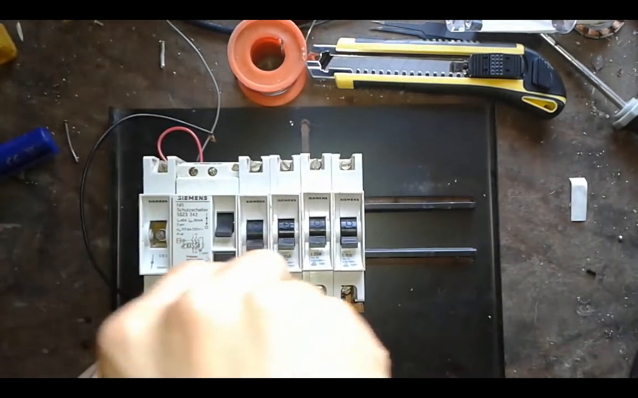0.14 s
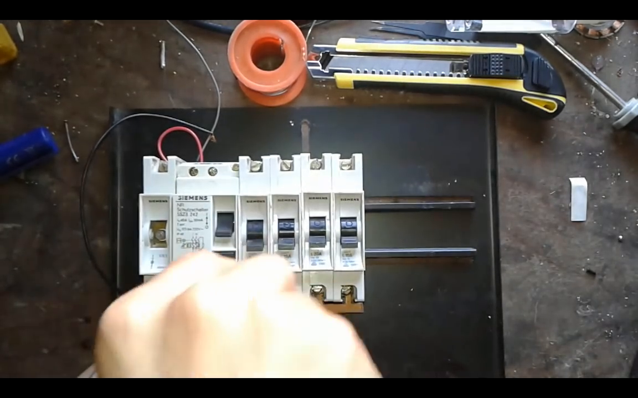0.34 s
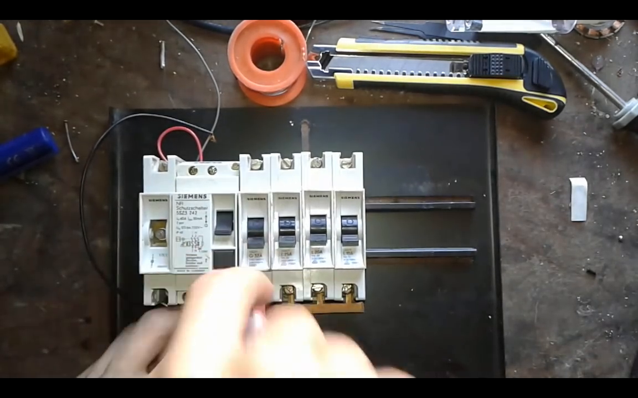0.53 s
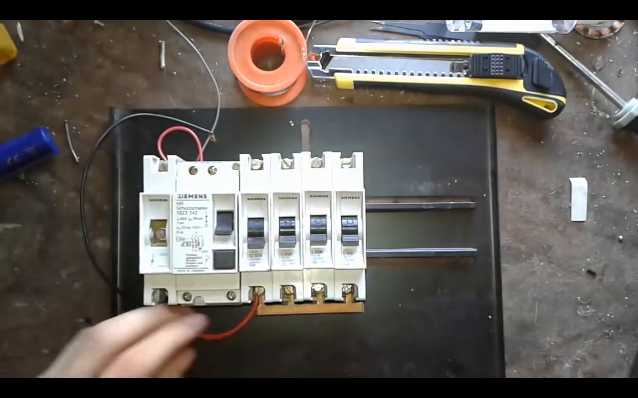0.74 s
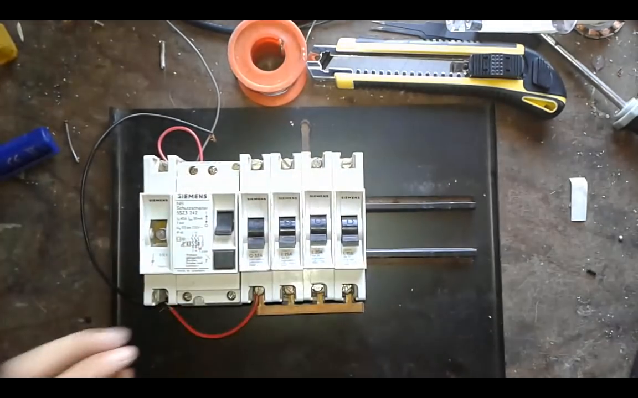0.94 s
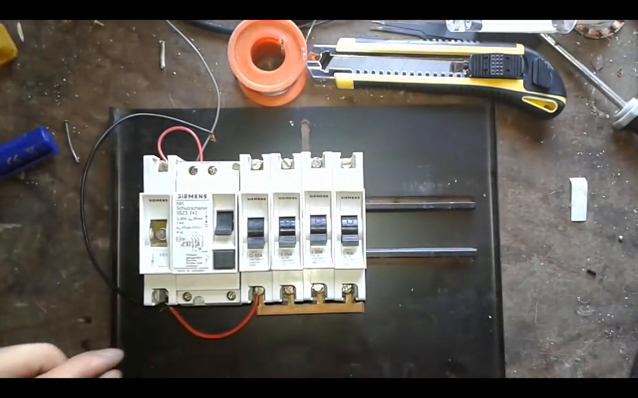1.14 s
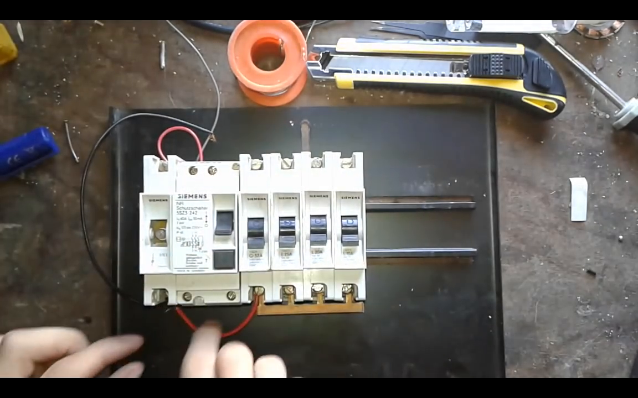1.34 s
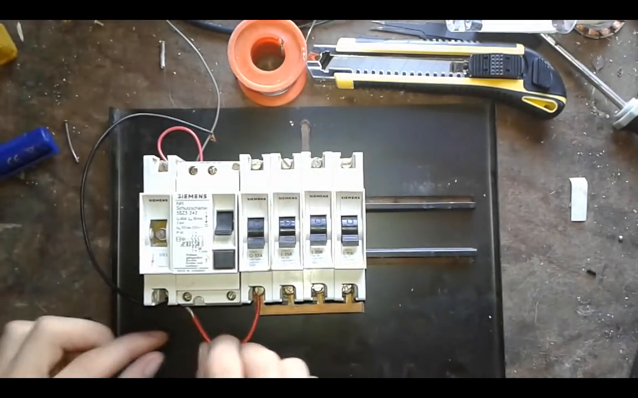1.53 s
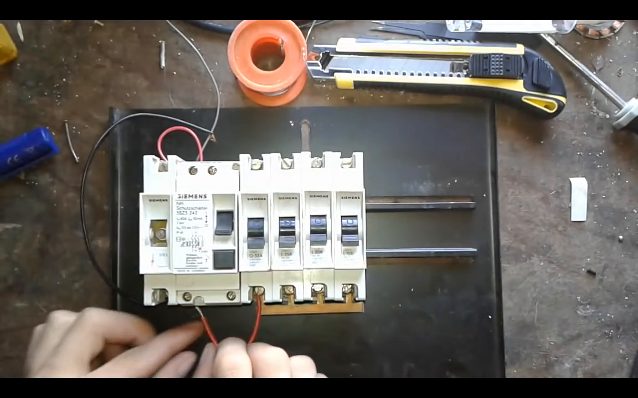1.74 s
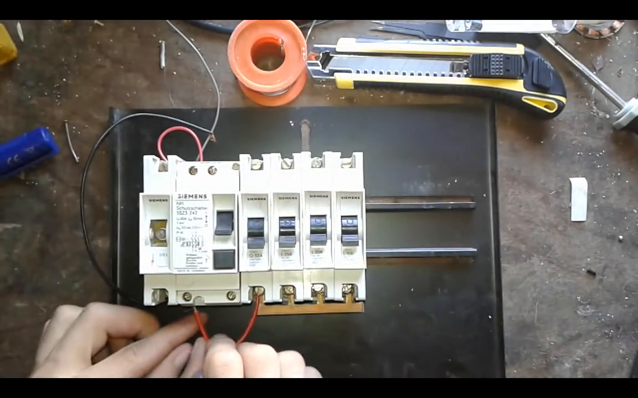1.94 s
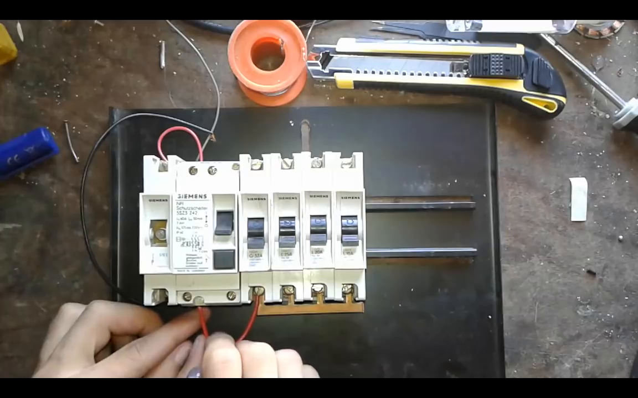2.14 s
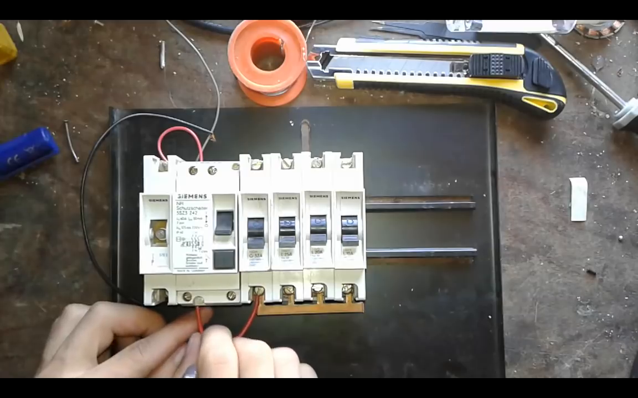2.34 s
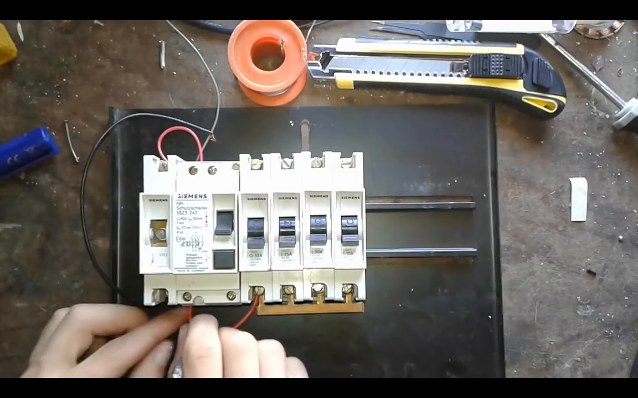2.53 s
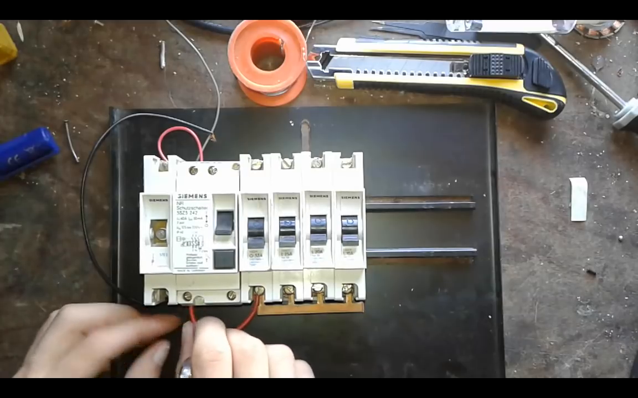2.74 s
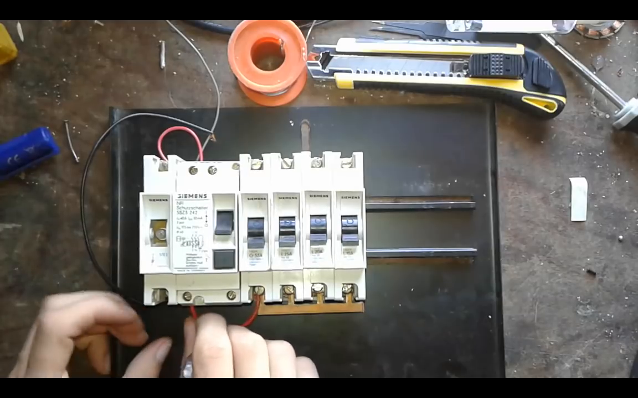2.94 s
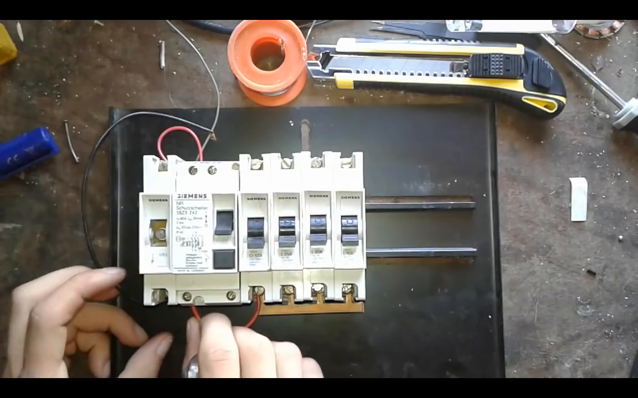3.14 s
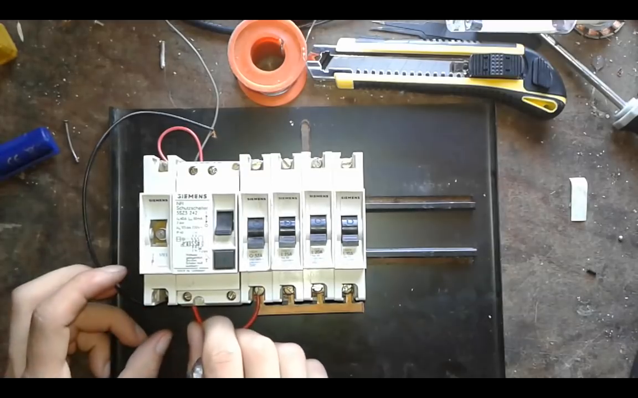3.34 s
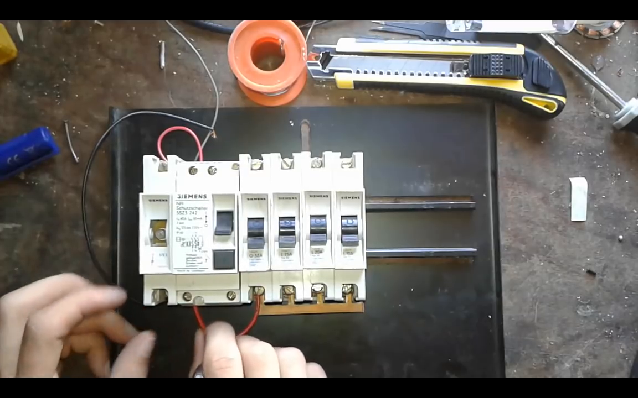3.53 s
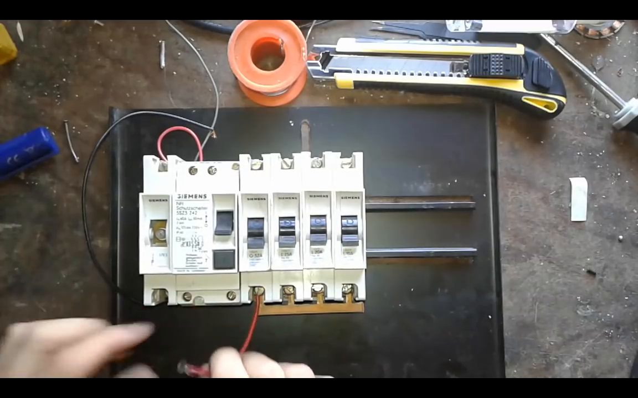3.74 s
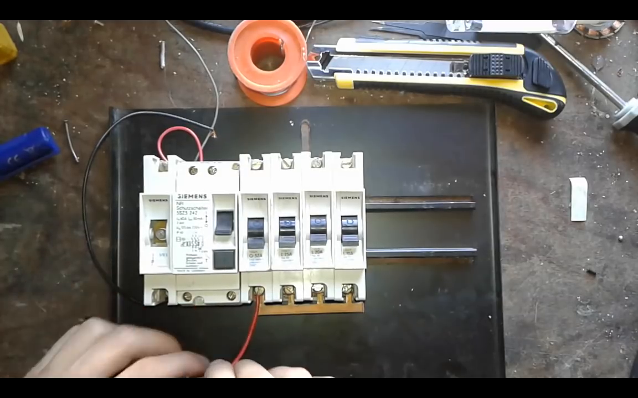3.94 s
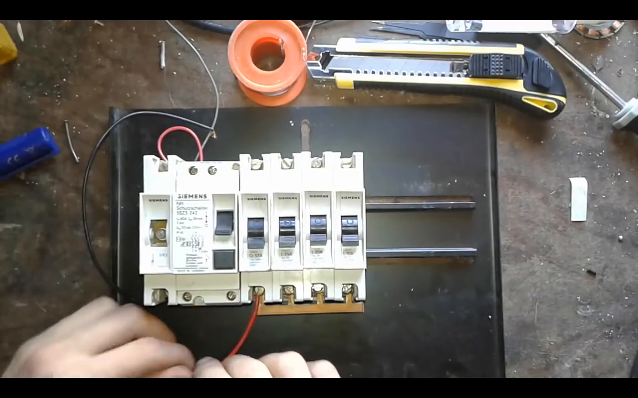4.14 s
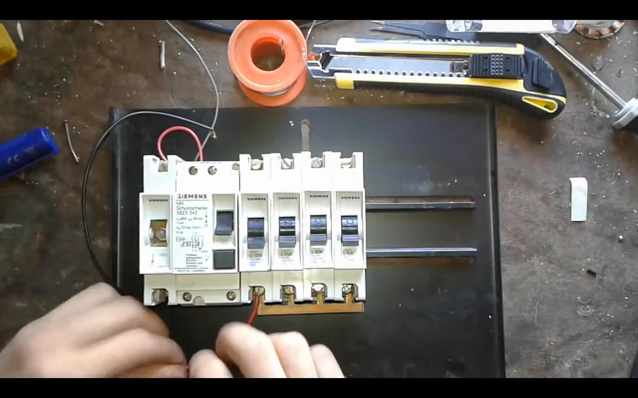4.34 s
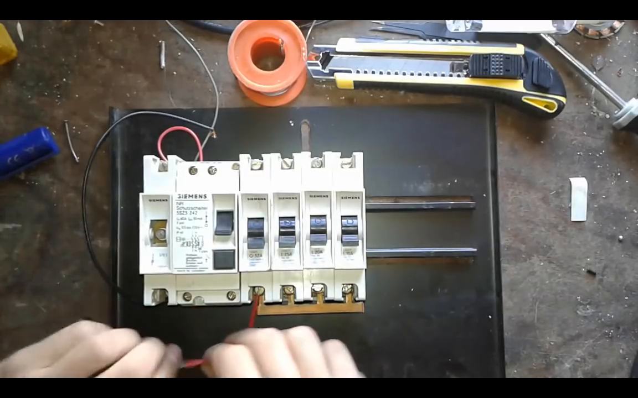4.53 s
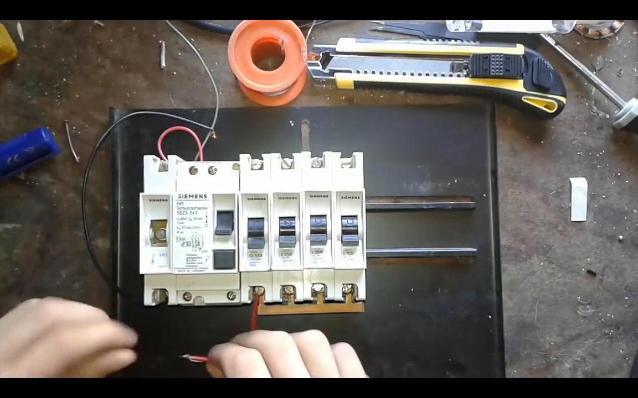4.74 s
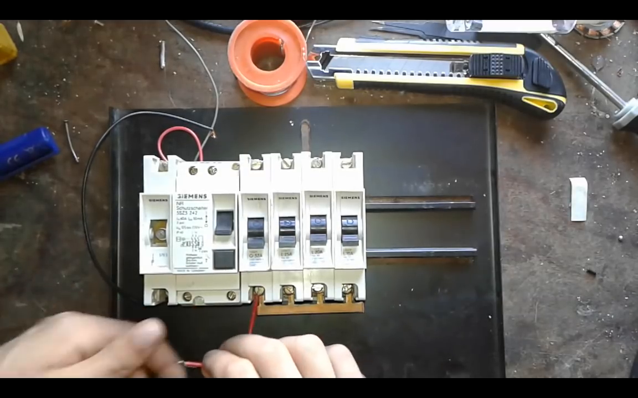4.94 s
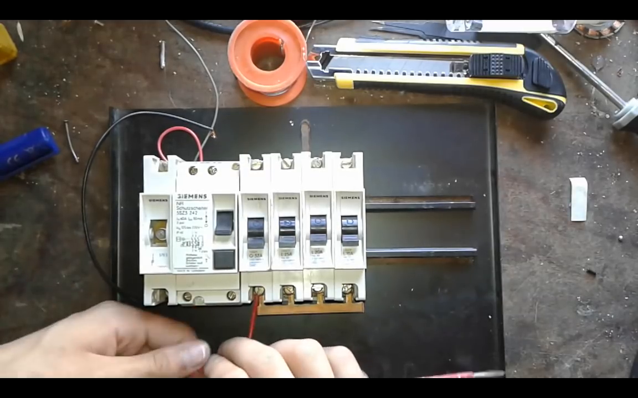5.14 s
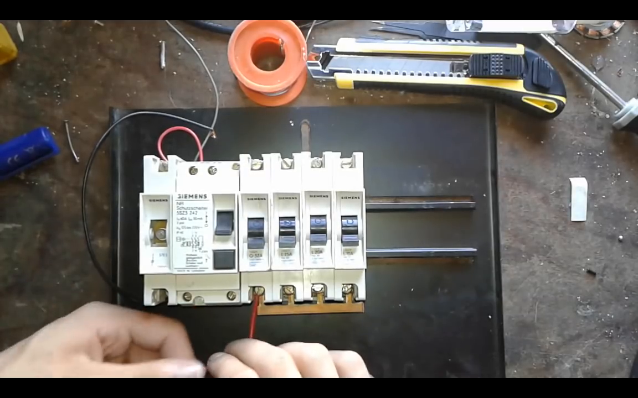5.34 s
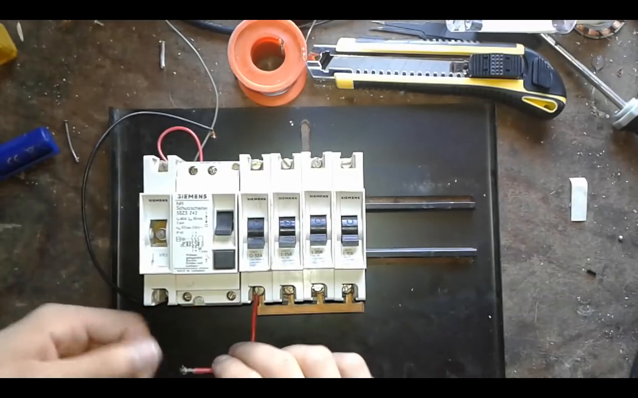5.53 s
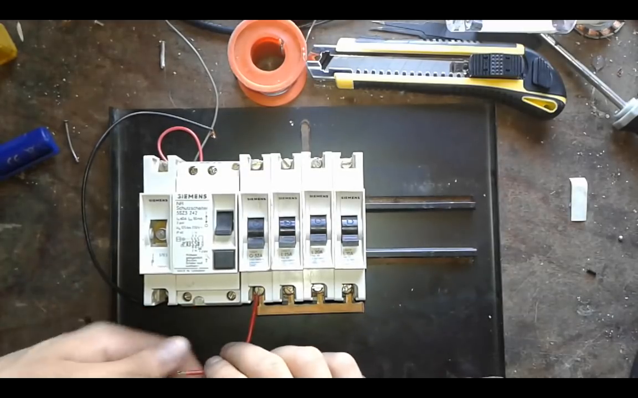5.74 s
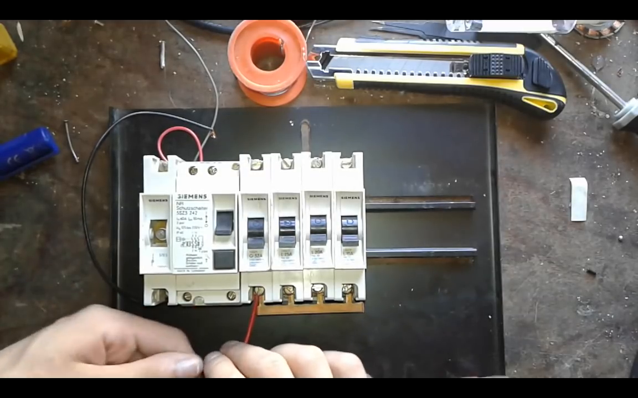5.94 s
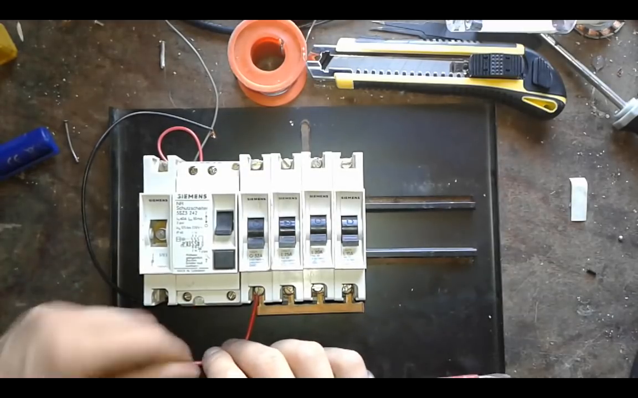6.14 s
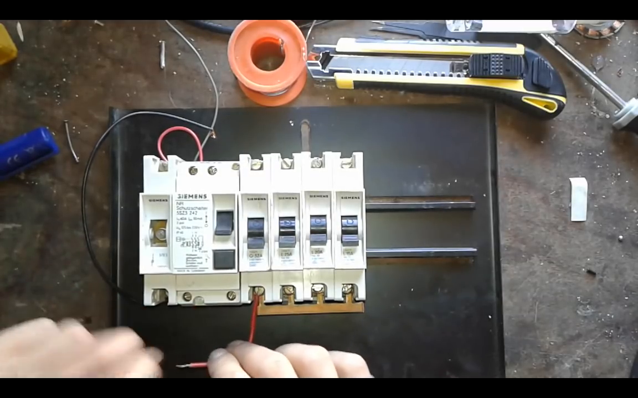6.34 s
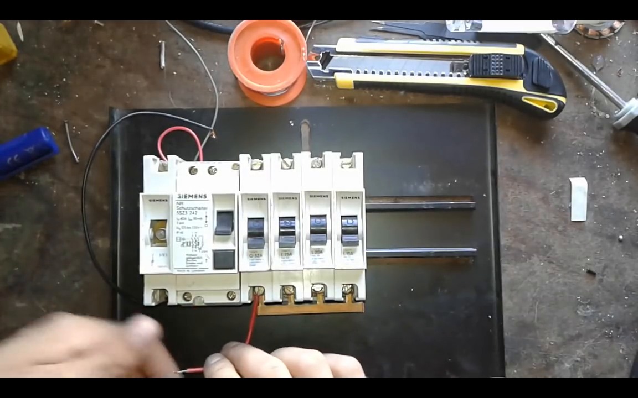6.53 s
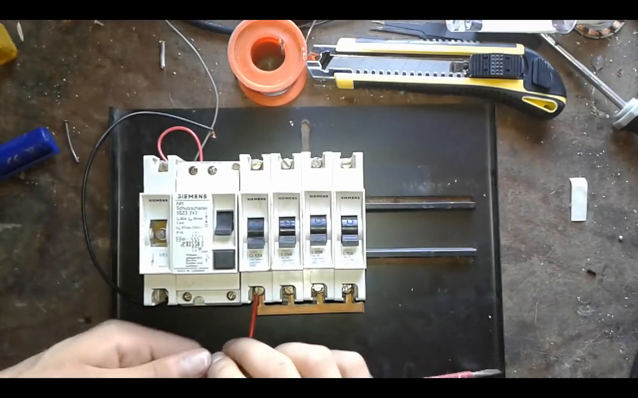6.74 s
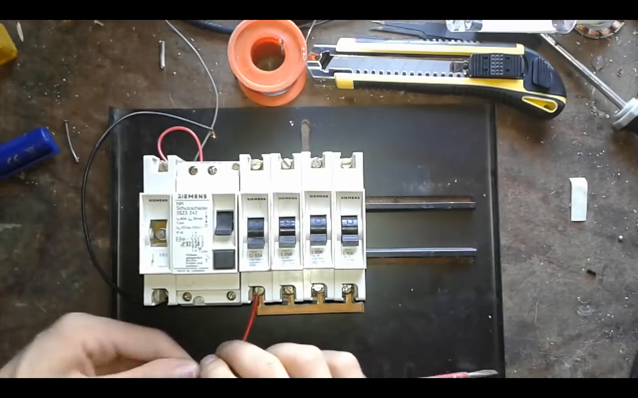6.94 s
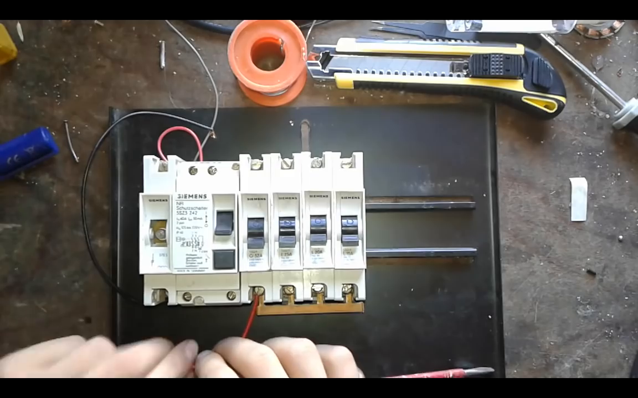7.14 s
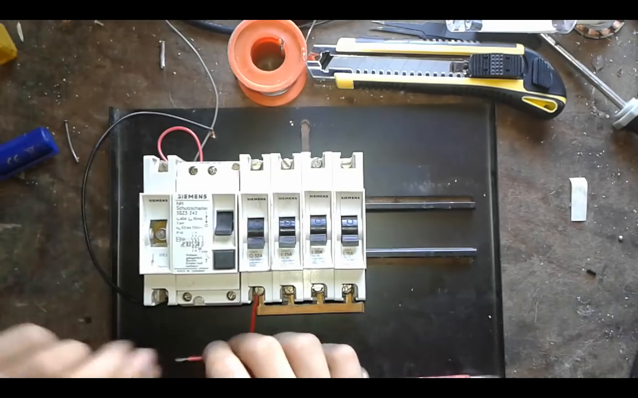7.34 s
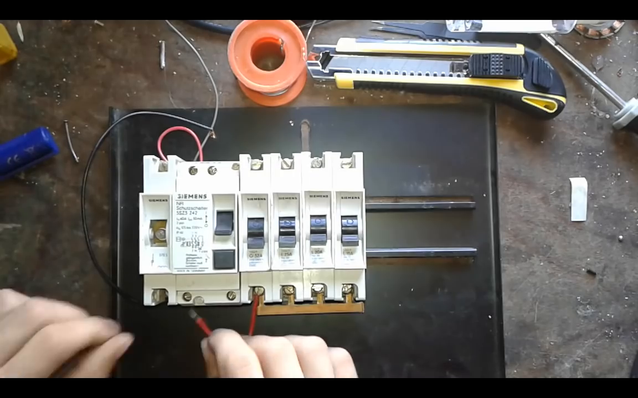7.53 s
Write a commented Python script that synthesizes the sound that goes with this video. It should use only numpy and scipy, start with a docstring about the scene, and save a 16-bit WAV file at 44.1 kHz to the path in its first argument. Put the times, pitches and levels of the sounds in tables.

```python
"""Soft hiss with a thin whine is heard first; metallic ticks, scrapes, clacks and knocks then stand out of it.
A wire is fitted to a row of plastic circuit breakers on a board: it ticks and slides in the terminals,
the housings clack, a hand tool knocks on the board and its steel jaws snap. Each contact is shaped noise
plus decaying modes; slides are trains of tiny slips, faint tones and squeaks are gliding sines. A small
microphone close above picks up all this with the reflections of the bench and a dry room."""
import sys
import numpy as np
from scipy import signal
from scipy.fft import rfft, irfft, next_fast_len
from scipy.io import wavfile
from scipy.ndimage import uniform_filter1d

SR = 44100
rng = np.random.default_rng(int(sys.argv[2]) if len(sys.argv) > 2 else 0)


def master(y):
    """Save y as 16-bit WAV."""
    cut = np.clip(np.atleast_2d(y).T, -1, 1)
    pcm = np.round(cut * 32767)  # scale
    wavfile.write(sys.argv[1], SR, pcm.astype(np.int16))


N = 334278  # samples

# Noise bands a quarter octave wide, and their centres [Hz]
BAND_EDGES_HZ = np.geomspace(22, 16500, 39)
BAND_HZ = np.sqrt(BAND_EDGES_HZ[1:] * BAND_EDGES_HZ[:-1])
# Time since a contact [s]; its first 30 ms set its level [samples]
AGE_S = np.arange(int(0.5 * SR)) / SR
LOUD_SAMPLES = int(0.03 * SR)
# Four zones of the spectrum (thud, middle, clack, treble): edges_hz, centres_hz
ZONE_EDGES_HZ = [600, 2000, 3600]
ZONE_CENTRES_HZ = [280, 1150, 2700, 5500]
ZONE_OCTAVES = np.log2(np.array(ZONE_CENTRES_HZ) / ZONE_CENTRES_HZ[1])

# Steady hiss, relative spectral density: pitch_hz, level_db (per Hz)
HISS_COLOUR = [(20,-24), (60,1.5), (140,0.5), (340,-5), (470,-7), (750,-7), (1300,-10), (2100,-13),
               (5700,-13), (7300,-9), (10000,-15), (16000,-18.5)]
# Narrow whines and hums: pitch_hz, nominal_width_hz, level_db (rms)
WHINES = [(7460, 64, -79), (6770, 650, -80.5), (5110, 260, -84.5), (472.4, 29, -83), (421.7, 26, -84)]
# Brief dips of the whole background: middle_s
DIP_TIMES = [3.06, 3.35]
HISS_LEVEL_DB = -69.5
DIP_DB, DIP_WIDTH_S = -4, 0.069

# Contacts: start_s, strength_db (before the gain of its layer), thud_db (bass relative to strength),
# hardness_db_per_octave (treble slope), hold_s (before it dies away),
# partials of the struck spot [(pitch_hz, level_db)]
TERMINAL_TICKS = [(0.359,-64,5,4.3,0.025,[]), (0.41,-60,0,4.7,0.003,[(5700,-55)]),
                  (.429,-45,-14,8.3,0.0047,[(3950,-43.5)]), (.448,-46,-8.5,5.4,0.004,[(5835,-50)]),
                  (.463,-48.5,-6,2.7,0.0051,[]), (.737,-53,6,0.86,0.0027,[]), (.775,-59,-8,8,0.0062,[]),
                  (3.707,-44.5,-16,2.4,0.022,[]), (3.721,-42.5,-14.5,3.3,0.041,[]),
                  (3.744,-43.5,-6.5,2.4,0.0035,[(2676,-46), (3960,-45.5)]),
                  (7.393,-39.5,-10.5,6.26,0.0076,[(1028,-47.5), (9270,-45)])]
BREAKER_KNOCKS = [(1.422,-38,-5.5,7,0.0063,[]), (1.433,-32,-9.5,0.7,0.0089,[(2630,-43), (3360,-38)]),
                  (1.471,-30,-15,1,0.007,[]), (1.483,-33.5,-4,-1.5,0.0025,[(285,-43.5), (1112,-38.5),
                  (1565,-41.5)]), (1.623,-47,-7,0.5,0.0092,[]), (3.578,-49.5,-11,-1.5,0.023,[]),
                  (4.519,-36.5,-5,-9,0.0054,[(250,-40.5)])]
BOARD_KNOCKS = [(4.482,-41,2.5,-0.5,0.0072,[]), (4.493,-38,-4,1.5,0.0097,[]),
                (4.51,-30.5,-7.5,1,0.0067,[(590,-50.5), (1960,-44.5)]), (5.105,-52.5,7,1,0.014,[]),
                (5.789,-45,7,2.5,0.018,[(420,-50)]), (6.484,-51,1.5,-0.2,0.017,[]),
                (6.605,-36,-4.5,-1,0.017,[]), (6.637,-33,-3.5,2,0.01,[(5200,-51)]),
                (7.108,-61,4.5,1.5,0.0068,[]), (7.183,-30,-11,-4,0.012,[(1930,-44.5), (416,-48.5),
                (2200,-52.5), (2460,-54)]), (7.528,-38.5,-6.5,-0.5,0.023,[]),
                (7.55,-39,2,-4,0.031,[(1220,-46)])]
JAW_SNAPS = [(5.215,-47,2.5,7,0.011,[(1290,-53.5)]), (5.927,-52,3.5,6.6,0.0084,[]),
             (6.637,-57.5,-3,6,0.006,[])]
FINGER_TAPS = [(5.356,-55.5,-0.5,-1,0.018,[]), (5.559,-55,-2.5,-3,0.054,[]), (6.16,-50.5,-1.5,-1,0.025,[])]
# Light touches of the wire's tip feeling for the terminal:
# start_s, strength_db (before the gain of its layer), hardness_db_per_octave, hold_s
GRAZES = [(1.903,-72,6,0.0046), (2.178,-68,4.5,0.0031), (2.297,-69,4.5,0.018), (2.399,-66.5,4.5,0.02),
          (2.498,-61,0.5,0.03), (2.649,-65.5,3.5,0.022), (2.859,-68,4,0.003), (4.746,-66,1.5,0.025)]
GRAZE_THUD_DB = -5
FINGER_TOP_HZ = 1140  # a soft fingertip wakes no mode above this
SPOT_T60_S = 0.15  # ring of the partials that belong to one spot

# Modes of the terminals, which all die alike: pitch_hz, level_db (relative)
TERMINAL_PARTIALS = [(990,-11), (1233,-10), (1541,-9), (2336,-7), (2680,-6), (2822,-6), (3301,-10),
                     (3810,-4), (3990,-1), (4188,-5), (4430,-1), (4800,-5), (5500,-2), (5837,-2), (7285,0)]
TERMINAL_T60_S = 0.15
TERMINAL_MODES = [(hz, db, TERMINAL_T60_S) for hz, db in TERMINAL_PARTIALS]
# Modes of housings, board, bench and steel jaws: pitch_hz, level_db (relative), t60_s
BREAKER_MODES = [(160,-6,.17), (263,-5,.14), (441,-8,.19), (470,-4,.16), (1112,-1,.14), (1204,-3,.14),
                 (1558,-5,.21), (1604,-2,.16), (1820,-9,.15), (2715,-3,.19), (2821,-3,.16), (3252,-6,.13),
                 (3360,-5,.19), (4120,-5,.13), (4425,-4,.13), (4700,-5,.12), (5841,-4,.11), (5949,-6,.11),
                 (6311,-8,.11), (7254,-6,.12)]
BOARD_MODES = [(849, 0.5, 0.17), (962, 3, 0.074), (1070, 3, 0.094), (1191, -9, 0.16), (1242, -7, 0.14),
               (1370, -5, 0.14), (1476, 0.5, 0.16), (4690, -8.5, 0.036), (5180, -6, 0.029)]
BENCH_MODES = [(177.5, 4, 0.2), (258.2, 2.5, 0.14), (417, -8, 0.23)]
JAW_MODES = [(848, -11, 0.17), (1119, -6.5, 0.094), (5240, -2.5, 0.049), (5350, -3, 0.052),
             (6690, 4.5, 0.096), (7060, 4, 0.048), (8400, -0.5, 0.018), (8770, -4, 0.028),
             (11500, -9.5, 0.048)]
# Broad colour of each kind of contact, relative spectral density: pitch_hz, level_db (per Hz)
TERMINAL_COLOUR = [(40,-25), (90,-8), (450,-8.5), (620,-18.5), (1100,-6.5), (1800,-8.5), (2400,-0.5),
                   (4000,-7), (7200,2.5), (9300,-6), (10500,-12), (16000,-38)]
BREAKER_COLOUR = [(40,-31), (90,-9), (300,-8), (480,-5.5), (620,-13), (1200,-5), (2100,-5), (2700,-5.5),
                  (4500,-7.5), (7000,-11), (9200,-13), (10200,-26), (16000,-27)]
BOARD_COLOUR = [(40,-12), (100,-21.5), (230,1), (450,3), (650,-7.5), (1000,2.5), (1400,-1), (1700,-11.5),
                (2100,-4.5), (4800,-11.5), (7000,-14.5), (9500,-21), (10600,-30.5), (16000,-39)]
JAW_COLOUR = [(40,-39), (170,12), (400,0), (650,-13), (1200,10), (1900,-35.5), (3200,-46), (4000,-7),
              (7000,1.5), (9400,-4), (10200,-16), (16000,-21)]

# Slides of wire and fingers, pressing harder until they let go:
# start_s, end_s, level_db (drive at the end, before the jerks), treble_db (extra drive of the treble)
SLIDES = [(0.52,0.766,-58,-0.5), (3.418,3.48,-63.5,3), (3.563,3.672,-56,-3.5), (5.29,5.477,-66,-2.5),
          (5.796,5.937,-64,0), (7.11,7.294,-55.5,-3.5), (7.307,7.387,-51,0), (7.418,7.55,-55,-1)]
# Relative spectrum of the rubbing, before the wire's resonances: pitch_hz, level_db
RUB_COLOUR = [(59, -30), (100, -3), (308, -2), (480, -1.5), (680, -10), (1080, -5), (1720, -8),
              (2040, -9.5), (7500, -8.5), (11000, -15.5), (16000, -24)]
# Resonances of the sliding wire: pitch_hz, half_width_hz, lift_db
WIRE_RESONANCES = [(1300,49,5.5), (2850,89,3), (4400,340,2), (6560,460,7)]
SLIDE_TREBLE_HZ = 3230  # the treble begins here
SLIDE_SWELL_DB, SLIDE_ATTACK_S, SLIDE_RELEASE_T60_S = 9, 0.0068, 0.74
SLIDE_JERK_DB, SLIDE_JERKS_PER_S = -1, 70

# Bumps of a hand on the bench: start_s, pitch_hz, level_db (where the decay begins), t60_s
BUMPS = [(0.673, 156, -51, 0.1), (6.759, 96.4, -49, 0.15)]
# Faint gliding background tones, and brief wire squeaks:
# start_s, end_s, start_pitch_hz, end_pitch_hz, level_db (peak), jitter (share of the pitch)
GLIDES = [(0.845, 1.05, 520, 692, -73, .004), (3.464, 3.503, 5130, 5200, -60, 0.018),
          (4.188, 4.393, 1376, 1316, -76, .004), (4.581, 4.83, 1332, 1290, -74.5, 0.0037),
          (7.338, 7.41, 6230, 6160, -48.5, 0.025)]
CUTOFF_HZ = 15850


def from_db(db):
    """Amplitude is an exponential function of level: decibels to gain."""
    return 10 ** (np.asarray(db) / 20)


def rms_one(x):
    """Normalization of power: scales a signal to an rms of 1."""
    return x / np.sqrt(np.mean(x ** 2) + 1e-20)


def band_gains(colour):
    """Band power is density times bandwidth: gain of each band, for a total power of 1."""
    hz, db = np.transpose(colour)
    density_db = np.interp(np.log(BAND_HZ), np.log(hz), db)
    gains = from_db(density_db) * np.sqrt(np.diff(BAND_EDGES_HZ))
    return gains / np.linalg.norm(gains)


def noise_bands():
    """Filter-bank analysis: bands of rms 1, neighbours drawn from independent noises."""
    white = rng.standard_normal((2, N))
    bands = []
    for k, edges in enumerate(zip(BAND_EDGES_HZ, BAND_EDGES_HZ[1:])):
        sos = signal.butter(3, edges, "band", fs=SR, output="sos")
        bands.append(rms_one(signal.sosfilt(sos, white[k % 2])))
    return np.array(bands)


def background(bands):
    """Resonance selects whines and hums from noise; they join the hiss, and all of it dips briefly."""
    out = band_gains(HISS_COLOUR) @ bands * from_db(HISS_LEVEL_DB)
    for hz, width_hz, db in WHINES:
        b, a = signal.iirpeak(hz, hz / (0.55 * width_hz), fs=SR)
        once = signal.lfilter(b, a, rng.standard_normal(N))
        out += from_db(db) * rms_one(signal.lfilter(b, a, once))
    t = np.arange(N) / SR
    dips = sum(np.exp(-((t - s) / DIP_WIDTH_S) ** 2) for s in DIP_TIMES)
    return out * from_db(DIP_DB * dips)


def dying(hz, t60, hold, room_db=-35):
    """Build-up and exponential decay: lows rise later, long contacts swell and hold, the room trails."""
    build_cycles, swell_db, swell_share, room_t60_s = 1.38, -4, 0.63, 0.99
    build = 1 - np.exp(-(AGE_S * hz[:, None] / build_cycles) ** 2)
    swell = from_db(swell_db * np.exp(-AGE_S / (swell_share * hold)))
    fall = from_db(-60 * np.maximum(AGE_S - hold, 0) / t60[:, None])
    room = from_db(room_db - 60 * AGE_S / room_t60_s)
    return build * swell * np.hypot(fall, room)


def scatter(bands, colour, t60, hold):
    """Crowded modes of the bench smear the crack; a bounce ripples it, reflections grain its treble."""
    bass_lasts, grain_db, longest_bounce_s, bounce = 0.2, 2.5, 0.0025, 0.85
    start = rng.integers(SR // 2, N - len(AGE_S))
    grain = rms_one(uniform_filter1d(rng.standard_normal(len(AGE_S)), size=60))
    treble_share = np.clip(BAND_HZ / 5000, 0, 1)[:, None]
    # reading the noise from an earlier point delays it
    earlier = start - int(longest_bounce_s * rng.uniform(0.5, 1) * SR)
    direct = bands[:, start:start + len(AGE_S)]
    reflected = bands[:, earlier:earlier + len(AGE_S)]
    crack = direct + bounce * np.sqrt(treble_share) * reflected
    band_t60 = t60 * (BAND_HZ / 3000) ** -bass_lasts
    waves = crack * dying(BAND_HZ, band_t60, hold)
    waves = waves * (1 + treble_share * (from_db(grain_db * grain) - 1))
    energy = np.sum(waves ** 2, axis=1) / LOUD_SAMPLES
    return waves * (band_gains(colour) / np.sqrt(energy))[:, None]


def ringing(modes, hold, blur):
    """Modal superposition with random strengths and phases; reflections blur the high lines most."""
    uneven_db, blur_hz, room_db = 1.5, 15, -44
    hz, db, t60 = np.transpose(modes)
    strength = from_db(db + uneven_db * rng.standard_normal(len(hz)))
    waver = uniform_filter1d(rng.standard_normal((len(hz), len(AGE_S))), size=90)
    pitch = hz[:, None] + (blur_hz + blur * hz[:, None]) * rms_one(waver)
    turns = np.cumsum(pitch, axis=1) / SR + rng.random((len(hz), 1))
    waves = strength[:, None] * np.sin(2 * np.pi * turns) * dying(hz, t60, hold, room_db)
    return waves / np.sqrt(np.sum(waves ** 2) / LOUD_SAMPLES)


def contacts(bands, events, modes, colour, level_db, ring_db, clack_db, t60, blur):
    """Impact excitation: heavy blows thud, hard ones tilt the treble up, a spot favours a few partials."""
    out = np.zeros(N + len(AGE_S))
    hz = np.r_[BAND_HZ, np.array(modes)[:, 0]]
    zone = np.digitize(hz, ZONE_EDGES_HZ)
    for s, strength_db, thud_db, hardness, hold, partials in events:
        tilt_db = hardness * np.maximum(ZONE_OCTAVES, 0)
        zone_db = strength_db + tilt_db + np.array([thud_db, 0, clack_db, 0])
        crack = scatter(bands, colour, t60, hold)
        ring = from_db(ring_db) * ringing(modes, hold, blur)
        waves = np.vstack([crack, ring])
        # weigh each component by what its zone still lacks
        power = np.mean(waves[:, :LOUD_SAMPLES] ** 2, axis=1)
        natural_db = 10 * np.log10(np.bincount(zone, power))
        weight_db = np.interp(np.log(hz), np.log(ZONE_CENTRES_HZ), zone_db - natural_db)
        blow = from_db(weight_db + level_db) @ waves
        for spot_hz, db in partials:
            blow += from_db(db) * ringing([(spot_hz, 0, SPOT_T60_S)], hold, blur)[0]
        at = int(s * SR)
        out[at:at + len(AGE_S)] += blow
    return out[:N]


def terminal_ticks(bands):
    """Impact on small metal parts: the wire's ticks wake terminal modes that decay alike."""
    return contacts(bands, TERMINAL_TICKS, TERMINAL_MODES, TERMINAL_COLOUR,
                    level_db=-7.5, ring_db=-3.0, clack_db=-3.0, t60=0.14, blur=0.0094)


def pressure(treble):
    """Friction grows with pressing: a quick start, a swell in small jerks, decay after letting go."""
    t, out = np.arange(N) / SR, np.zeros(N)
    for start, end, db, treble_db in SLIDES:
        still_to_go = np.clip((end - t) / (end - start), 0, 1)
        attack = np.clip((t - start) / SLIDE_ATTACK_S, 0, 1)
        release_db = -60 * np.maximum(t - end, 0) / SLIDE_RELEASE_T60_S
        drive_db = db + treble * treble_db - SLIDE_SWELL_DB * still_to_go + release_db
        out = np.maximum(out, attack * from_db(drive_db))
    jerks = np.interp(t * SLIDE_JERKS_PER_S, np.arange(N), rng.standard_normal(N))
    return out * from_db(SLIDE_JERK_DB * jerks)


def rubbing():
    """Friction as uneven tiny slips, convolved with reflections; bare metal adds more treble than skin."""
    slips_per_s, spread_db, smear_t60_s = 1400, 1.5, 0.052
    slip_size = from_db(spread_db * np.minimum(rng.exponential(1, N), 4))
    slips = (rng.random(N) < slips_per_s / SR) * rng.choice([-1, 1], N) * slip_size
    reflections = rng.standard_normal(len(AGE_S)) * from_db(-60 * AGE_S / smear_t60_s)
    hz, db = np.transpose(RUB_COLOUR)
    size = next_fast_len(N)
    bins_hz = np.maximum(np.fft.rfftfreq(size, 1 / SR), 1)
    colour_db = np.interp(np.log(bins_hz), np.log(hz), db)
    for centre, half_width, lift_db in WIRE_RESONANCES:
        colour_db += lift_db / (1 + ((bins_hz - centre) / half_width) ** 2)
    spectrum = rfft(slips, size) * rfft(reflections, size) * from_db(colour_db)
    rub = rms_one(irfft(spectrum, size)[:N])
    lowpass = signal.butter(2, SLIDE_TREBLE_HZ, fs=SR, output="sos")
    body = signal.sosfiltfilt(lowpass, rub)
    return body * pressure(treble=False) + (rub - body) * pressure(treble=True)


def bumps():
    """Soft excitation lacks high frequencies: a hand wakes one low, decaying mode of the bench."""
    out = np.zeros(N)
    for s, hz, db, t60 in BUMPS:
        age = np.maximum(np.arange(N) / SR - s, 0)
        build = 1 - np.exp(-age * hz)
        out += np.sin(2 * np.pi * hz * age) * build * from_db(db - 60 * age / t60)
    return out


def gliding_tones():
    """Frequency modulation: thin gliding tones swell and fade, and jitter of pitch makes a squeak."""
    out = np.zeros(N)
    for start, end, start_hz, end_hz, db, jitter in GLIDES:
        at = np.arange(int(start * SR), int(end * SR))
        waver = rms_one(uniform_filter1d(rng.standard_normal(N), size=40))[at]
        pitch = np.linspace(start_hz, end_hz, len(at)) * (1 + jitter * waver)
        phase = 2 * np.pi * np.cumsum(pitch) / SR
        out[at] += from_db(db) * np.sin(phase) * np.sqrt(np.hanning(len(at)))
    return out


def breaker_knocks(bands):
    """Impact on thin shells: the plastic housings clack through many short-lived modes."""
    return contacts(bands, BREAKER_KNOCKS, BREAKER_MODES, BREAKER_COLOUR,
                    level_db=-6.5, ring_db=2.0, clack_db=-5.0, t60=0.17, blur=0.005)


def terminal_grazes(bands):
    """Light contact excites modes weakly: the wire's tip feels for the terminal, ringing it little."""
    touches = [(s, db, GRAZE_THUD_DB, hardness, hold, []) for s, db, hardness, hold in GRAZES]
    return contacts(bands, touches, TERMINAL_MODES, TERMINAL_COLOUR,
                    level_db=-6.0, ring_db=-10.0, clack_db=-8.0, t60=0.13, blur=0.0082)


def board_knocks(bands):
    """Coupled plates: a hand tool's knock wakes the modes of the board and the bench together."""
    return contacts(bands, BOARD_KNOCKS, BOARD_MODES + BENCH_MODES, BOARD_COLOUR,
                    level_db=-8.5, ring_db=0.5, clack_db=-7.5, t60=0.14, blur=0.016)


def jaw_snaps(bands):
    """Impact of steel on steel: snapping jaws ring high, with the low modes of the bench below."""
    return contacts(bands, JAW_SNAPS, JAW_MODES + BENCH_MODES, JAW_COLOUR,
                    level_db=-0.85, ring_db=7.0, clack_db=-9.0, t60=0.13, blur=0.0142)


def finger_taps(bands):
    """A soft striker excites only low modes: fingertips tap the board and bench."""
    low_modes = [mode for mode in BOARD_MODES + BENCH_MODES if mode[0] < FINGER_TOP_HZ]
    return contacts(bands, FINGER_TAPS, low_modes, BOARD_COLOUR,
                    level_db=-8.5, ring_db=5.0, clack_db=-10.0, t60=0.14, blur=0.018)


def scene():
    """Linear superposition: all the handling noises and gliding tones over the background."""
    bands = noise_bands()
    out = background(bands)
    out += terminal_ticks(bands) + rubbing() + bumps() + gliding_tones()
    out += breaker_knocks(bands) + terminal_grazes(bands) + board_knocks(bands)
    out += jaw_snaps(bands) + finger_taps(bands)
    return out[None]


def record(dry):
    """Band limitation: a steep low-pass filter cuts the top."""
    lowpass = signal.ellip(12, 0.1, 80, CUTOFF_HZ, fs=SR, output="sos")
    return signal.sosfilt(lowpass, dry)


dry = scene()
out = record(dry)
master(out)
```